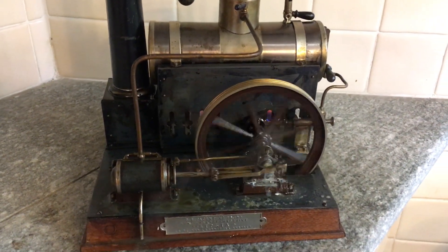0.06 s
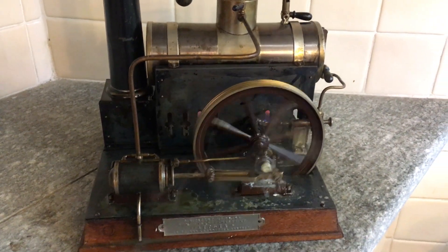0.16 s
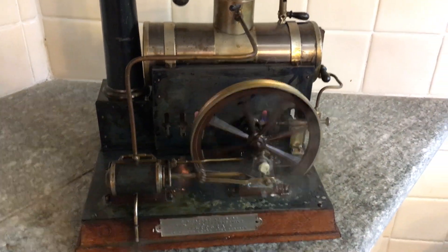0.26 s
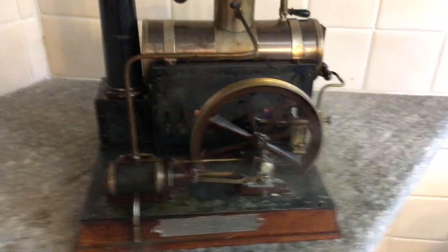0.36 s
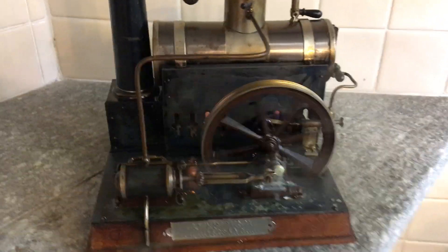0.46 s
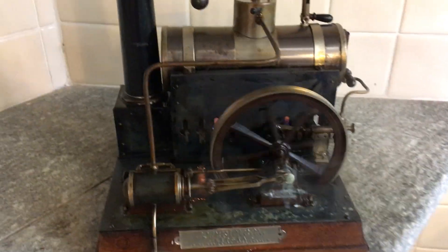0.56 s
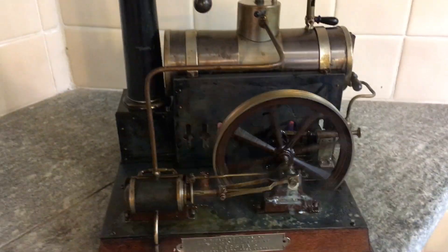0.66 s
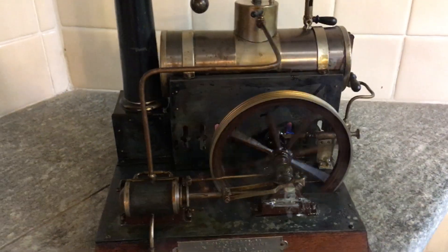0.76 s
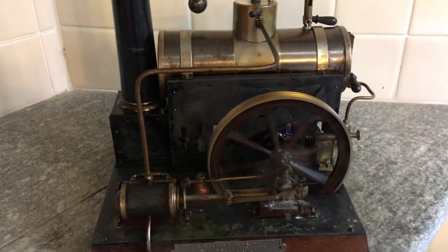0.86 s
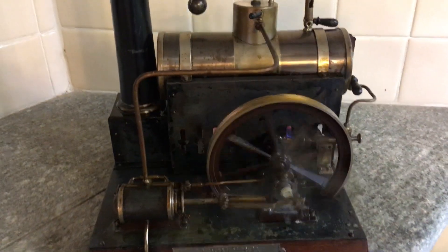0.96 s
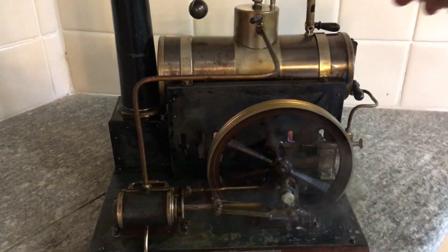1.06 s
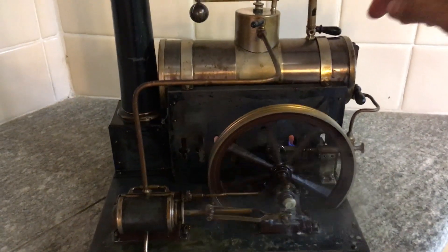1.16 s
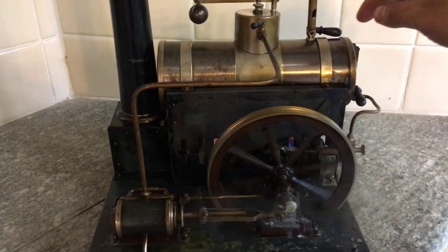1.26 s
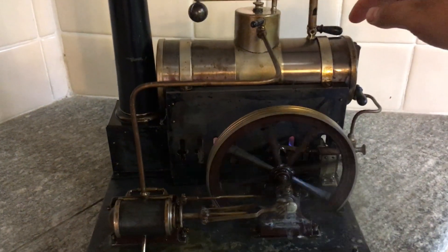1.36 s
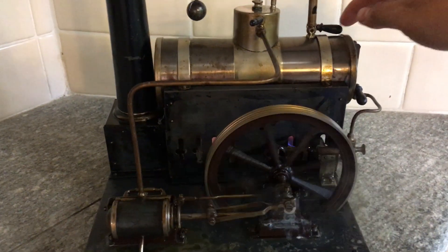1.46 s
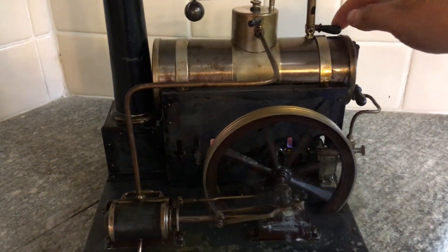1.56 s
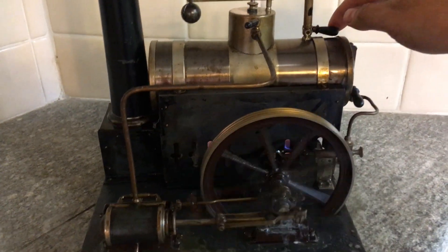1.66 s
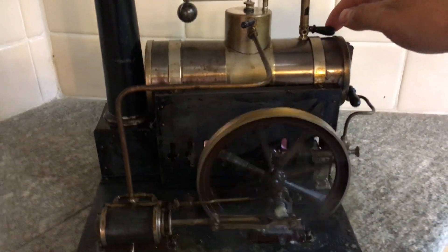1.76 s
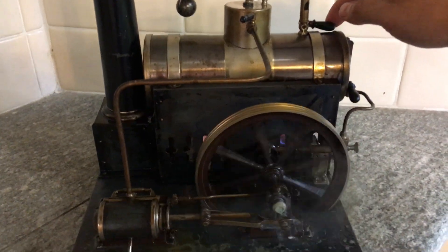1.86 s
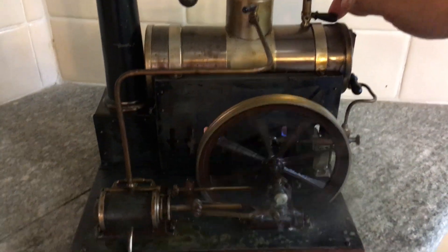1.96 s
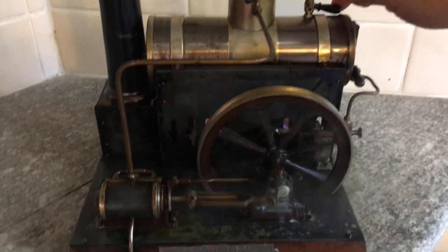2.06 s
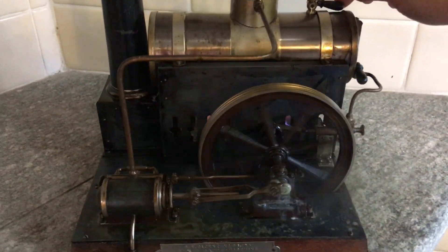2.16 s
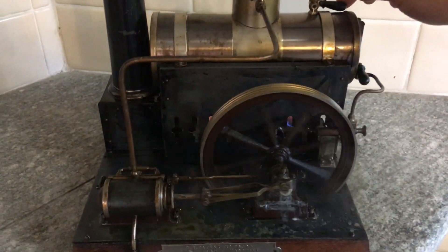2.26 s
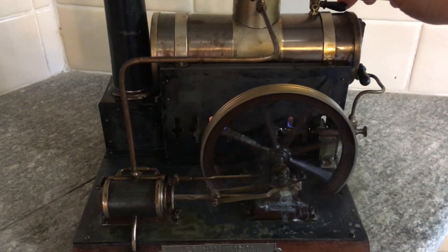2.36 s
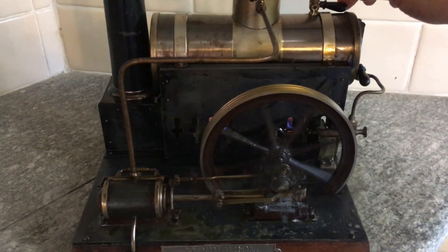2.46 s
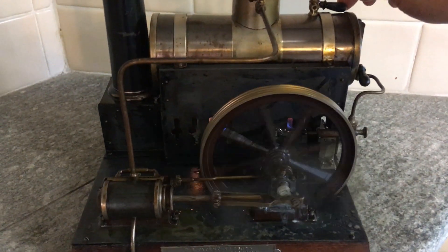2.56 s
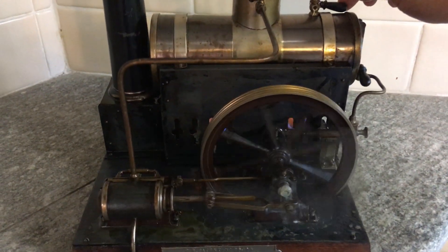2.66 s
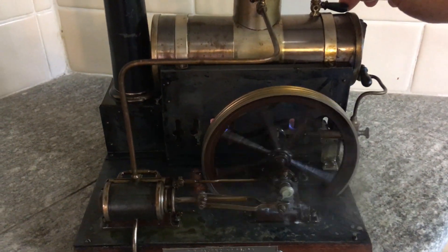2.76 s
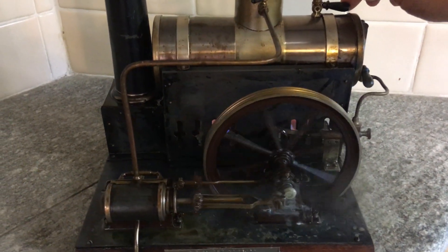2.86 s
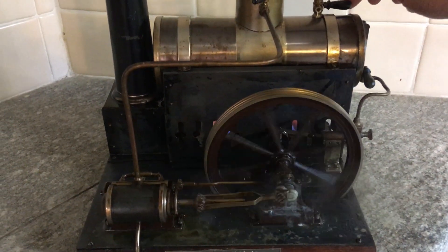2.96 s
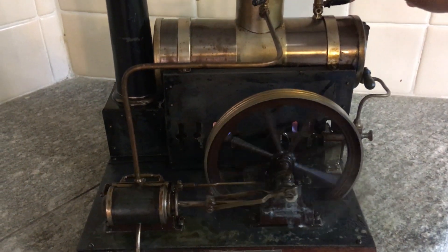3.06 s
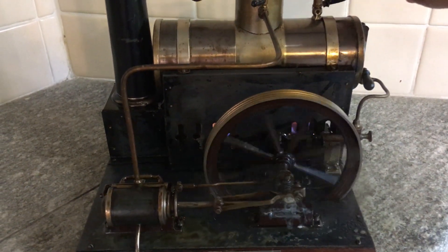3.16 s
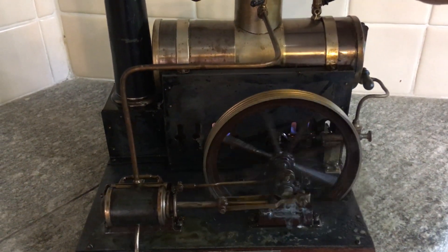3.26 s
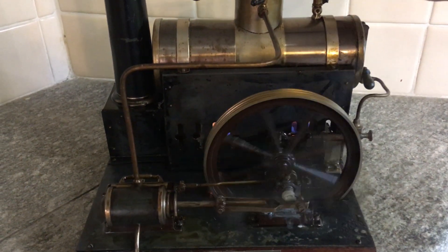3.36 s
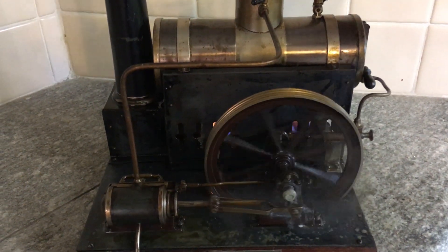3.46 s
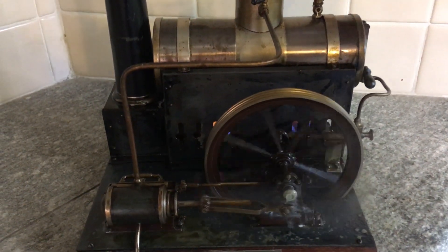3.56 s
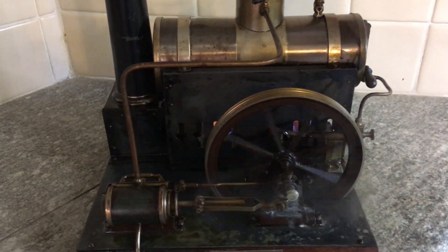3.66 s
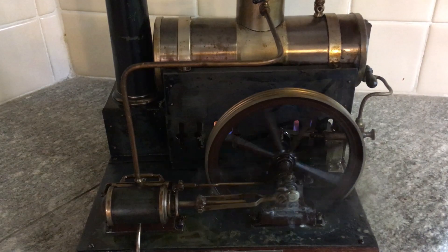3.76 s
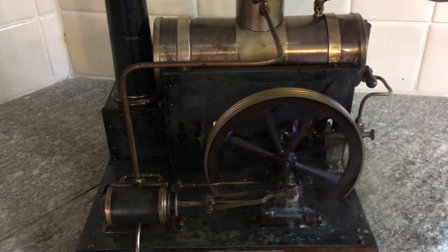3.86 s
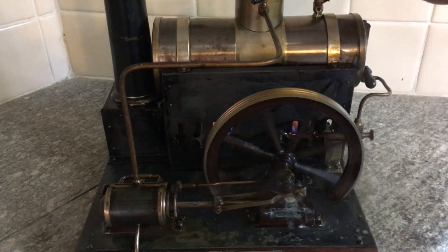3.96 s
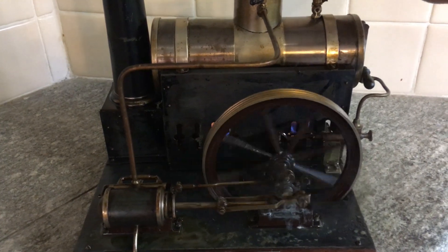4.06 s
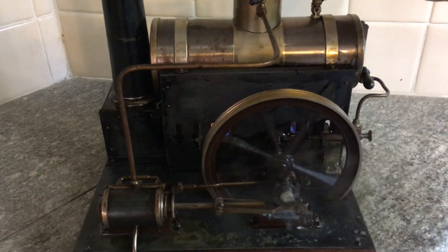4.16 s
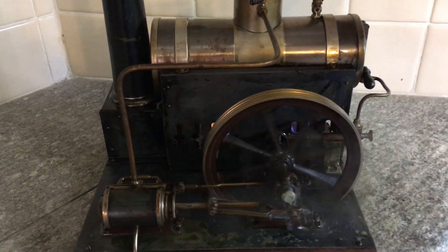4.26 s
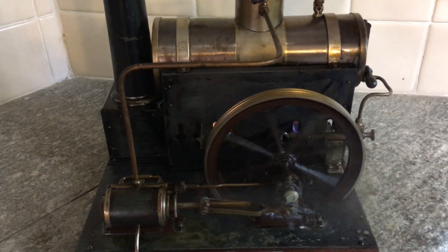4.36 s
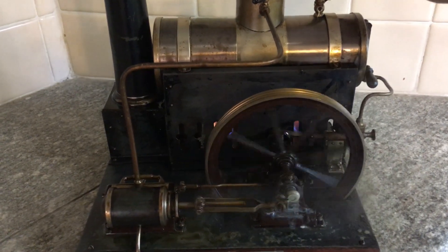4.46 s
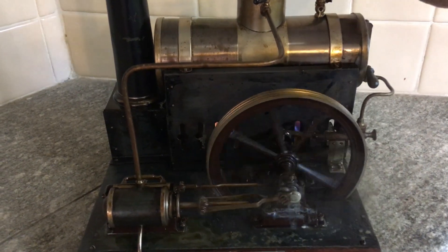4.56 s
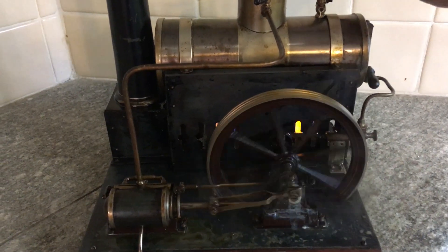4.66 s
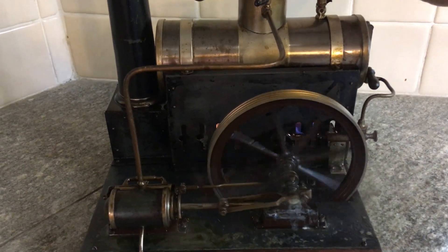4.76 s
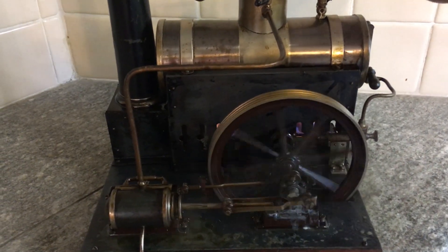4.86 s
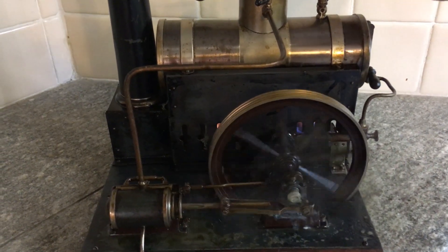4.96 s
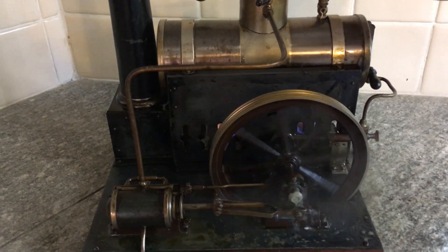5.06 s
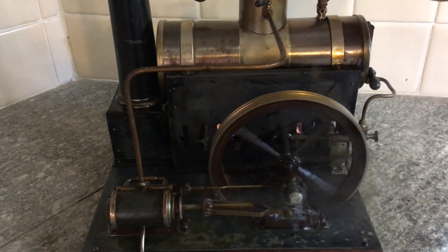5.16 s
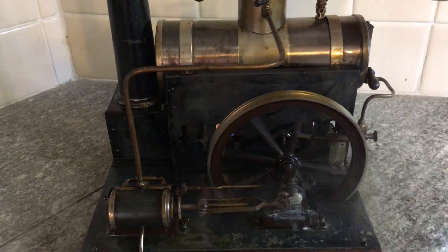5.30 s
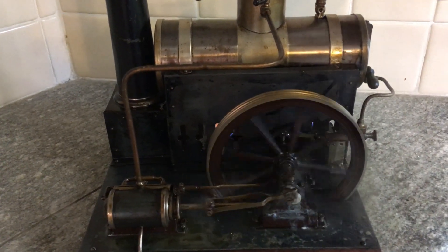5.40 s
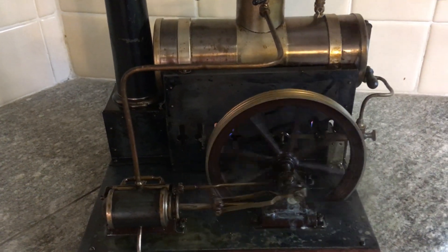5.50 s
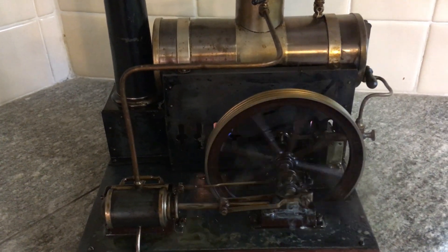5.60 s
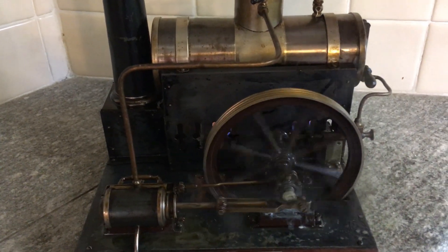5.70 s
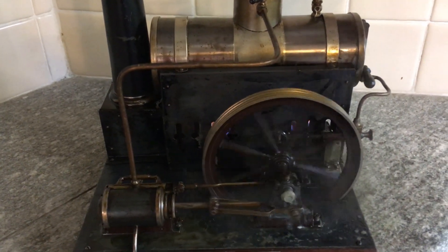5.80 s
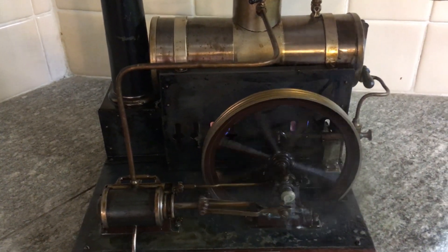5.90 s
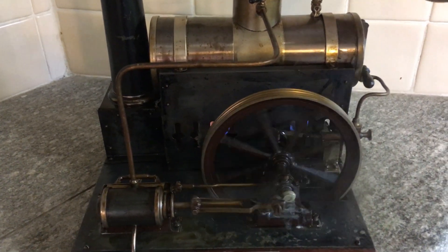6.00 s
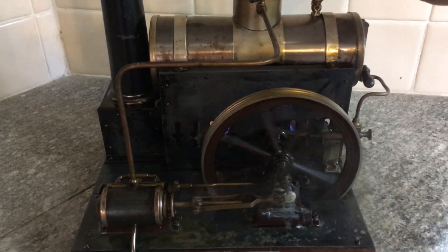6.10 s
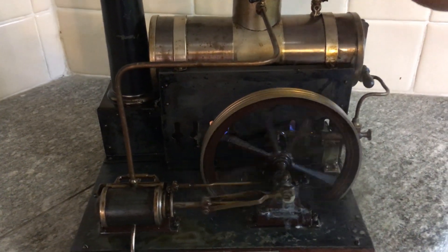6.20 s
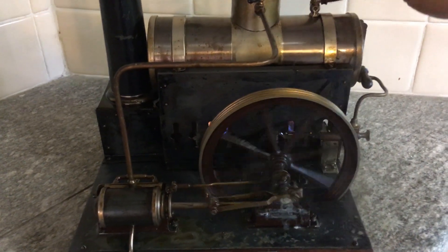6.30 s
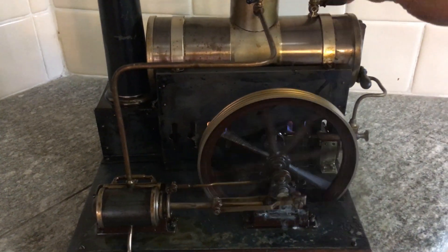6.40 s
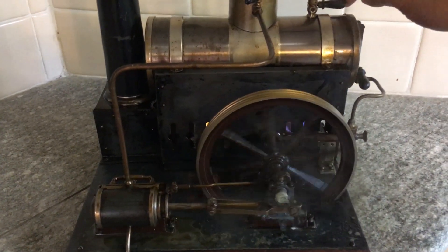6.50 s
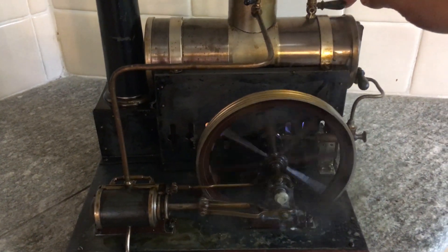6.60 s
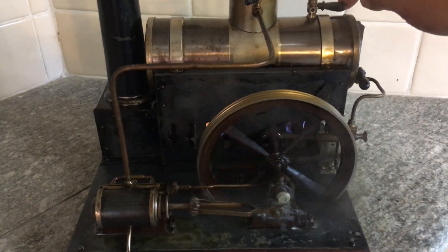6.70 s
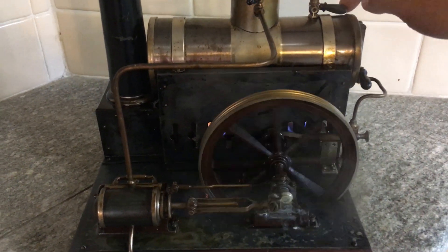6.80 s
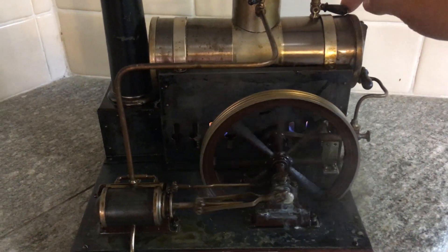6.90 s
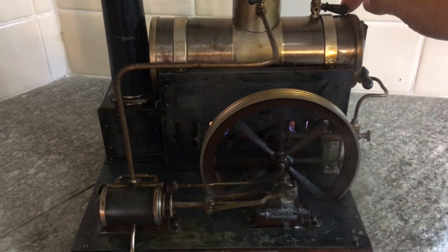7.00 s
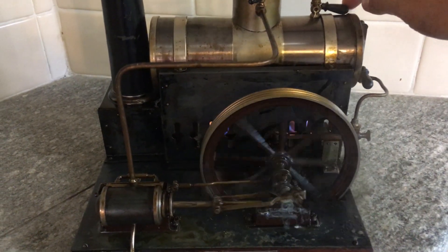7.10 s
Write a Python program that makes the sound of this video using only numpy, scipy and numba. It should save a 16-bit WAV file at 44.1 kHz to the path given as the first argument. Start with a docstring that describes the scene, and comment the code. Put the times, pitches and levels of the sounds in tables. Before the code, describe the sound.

Heard up close in a tiled kitchen, a miniature steam engine chuffs gently while its boiler sizzles and loose metal parts tick and faintly squeak. Then the steam whistle sounds three times, short, short and long, piercing and far louder than the engine, sliding up as it opens and down as it shuts. The background dips under the whistle, then the wet puffs, hiss and low fridge hum come back.

```python
"""Toy steam engine in a kitchen

The engine turns slowly, two wet exhaust puffs a turn, over a leaking, sizzling boiler.
Its whistle blows two short toots and a long one; pitch climbs and falls with the steam in the valve.
A fridge hums in the tiled room, and automatic gain control ducks everything under the whistle."""
import sys
import numpy as np
from scipy import signal
from scipy.fft import rfft, irfft, next_fast_len
from scipy.io import wavfile
from scipy.ndimage import uniform_filter1d, minimum_filter1d
from numba import njit

SR = 44100
rng = np.random.default_rng(int(sys.argv[2]) if len(sys.argv) > 2 else 0)


def inscribe(sig):
    """Save sig as 16-bit PCM at rate SR to the path in sys.argv[1].

    A 1-D sig is mono; a 2-D sig holds one channel per row.
    Samples are clipped to [-1, 1] before scaling.
    """
    pcm = np.round(np.clip(np.atleast_2d(sig).T, -1, 1) * 32767)
    wavfile.write(sys.argv[1], SR, pcm.astype(np.int16))


N = 314874
T = np.arange(N) / SR


def undb(db):
    """Decibels to gain."""
    return 10 ** (np.asarray(db) / 20)


def unit(x):
    """Scale to rms 1."""
    return x / np.sqrt(np.mean(x ** 2))


def decay(t, t60_s):
    """Exponential fall, 60 dB in t60_s."""
    return np.exp(-np.log(1000) * t / t60_s)


def bump(middle_s, width_s):
    """Bell-shaped swell of height 1."""
    return np.exp(-np.minimum(((T - middle_s) / width_s) ** 2, 50))


def walk(rate_hz):
    """Smooth random wander, rms 1."""
    hold = max(int(SR / rate_hz), 2)
    steps = np.repeat(rng.standard_normal(N // hold + 1), hold)
    return unit(uniform_filter1d(uniform_filter1d(steps, hold), hold)[:N])


def noise(colour):
    """Noise of rms 1, shaped by (freq_hz, level_db) points."""
    hz, db = np.transpose(colour)
    size = next_fast_len(N)
    bins_hz = np.maximum(np.arange(size // 2 + 1) * SR / size, 1)
    shape = undb(np.interp(np.log(bins_hz), np.log(hz), db))
    return unit(irfft(rfft(rng.standard_normal(size)) * shape, size)[:N])


def band(hz, width_hz):
    """Noise of rms 1 in one steep-sided resonance."""
    b, a = signal.iirpeak(hz, hz / width_hz, fs=SR)
    return unit(signal.lfilter(b, a, signal.lfilter(b, a, rng.standard_normal(N))))


def phase_of(hz):
    """Oscillator phase for a pitch curve."""
    return 2 * np.pi * np.cumsum(hz) / SR


def tiled_room(x, wet_db, t60_s=0.97, treble_t60_s=0.29, split_hz=7000, gap_s=0.008):
    """Diffuse ring of the tiles; the treble dies first."""
    t = np.arange(SR) / SR
    scatter = rng.standard_normal(SR) * (t > gap_s)
    low = signal.sosfiltfilt(signal.butter(4, split_hz, fs=SR, output="sos"), scatter)
    response = low * decay(t, t60_s) + (scatter - low) * decay(t, treble_t60_s)
    return undb(wet_db) * signal.fftconvolve(x, response / np.linalg.norm(response))[:N]


def early_echoes(x, share_db=-7, gap_s=0.00045, spread_s=.006, count=14):
    """Reflections off boiler, counter and wall comb the hiss."""
    lags = ((gap_s + spread_s * rng.random(count)) * SR).astype(int)
    gains = undb(share_db) * rng.choice([-1, 1], count) / np.sqrt(count)
    echoes = sum(gain * np.pad(x, (lag, 0))[:N] for lag, gain in zip(lags, gains))
    return (x + echoes) / np.hypot(1, undb(share_db))


# fridge mains and motor tones: pitch_hz, level_db
FRIDGE_HUM = [(100.8, -63), (98.33, -60.5)]
# room murmur spectrum: freq_hz, level_db
ROOM_COLOUR = [(20, -43.5), (30, -20), (39, 2.5), (52, 2), (72, -3), (130, -9.5), (200, -12.5), (400, -13),
               (750, -16.5), (1100, -11.5), (2000, -24), (3500, -19)]

def kitchen(murmur_db=-56.5):
    """Mains hum beats with the slightly slower fridge motor over a low murmur."""
    hum = sum(np.sqrt(2) * undb(db) * np.sin(2 * np.pi * hz * T) for hz, db in FRIDGE_HUM)
    return hum + undb(murmur_db + 0.52 * walk(18)) * noise(ROOM_COLOUR)


# leak envelope: time_s, level_db
LEAK_LEVEL = [(0, -48.5), (.6, -46.5), (1.35, -45.5), (2.2, -46), (2.75, -44), (3.2, -46), (6.25, -39.5),
              (6.55, -42), (6.95, -41.5), (7.14, -47.5)]
# leak spectrum: freq_hz, level_db
LEAK_COLOUR = [(700, -30), (1800, -12.5), (2600, -16), (3200, -13.5), (4300, -15), (6000, -7.5),
               (7400, -12), (8700, -3.5), (10300, -4.5), (11600, 1), (13100, -2), (15700, -5)]
# gap resonances: centre_hz, width_hz, relative_db
LEAK_RINGS = [(9640, 150, -14), (11400, 710, -22), (13500, 780, -14)]

def boiler_leak(hiss_db=0.48, sizzle_db=1.4, drift_db=.5):
    """Wet steam sizzles through narrow gaps in the fittings, which ring faintly."""
    envelope = undb(np.interp(T, *np.transpose(LEAK_LEVEL)))
    rings = sum(undb(db + 2 * walk(2.5)) * band(hz, width_hz) for hz, width_hz, db in LEAK_RINGS)
    hiss = undb(hiss_db) * noise(LEAK_COLOUR)
    return envelope * (hiss + rings) * undb(sizzle_db * walk(900) + drift_db * walk(35))


def linkage(level_db=-54.5, scatter_db=1.5, centre_hz=1100, t60_s=0.0091, count=90):
    """Play in rods and bearings: faint ticks at random moments."""
    out, t = np.zeros(N), np.arange(SR // 40) / SR
    for start, (size, pitch) in zip(rng.integers(0, N - len(t), count), rng.standard_normal((count, 2))):
        tick = np.sin(2 * np.pi * centre_hz * np.exp(.4 * pitch) * t) * decay(t, t60_s)
        out[start:start + len(t)] += undb(level_db + scatter_db * size) * tick
    return out


# a bearing, then the valve handle: middle_s, half_length_s, pitch_hz, glide_hz_per_s, level_db
SQUEAKS = [(1.128, .07, 1163, 250, -58), (2.69, 0.052, 1407, -1300, -55)]

def squeaks(scrape_hz=55, octave_db=-12):
    """Thin, unsteady tones of dry metal."""
    out = np.zeros(N)
    for middle_s, half_s, hz, glide_hz_per_s, db in SQUEAKS:
        phase = phase_of(hz + glide_hz_per_s * (T - middle_s) + scrape_hz * walk(360))
        out += undb(db) * bump(middle_s, half_s) * (np.sin(phase) + undb(octave_db) * np.sin(2 * phase))
    return out


def wisp(middle_s=2.663, width_s=.02, level_db=-45):
    """Steam slips past the valve as the handle is touched."""
    return undb(level_db) * bump(middle_s, width_s) * band(6500, 12000)


# taps: start_s, level_db, pitch_hz, t60_s
KNOCKS = [(0.3714, -25, 225, 0.0041), (0.371, -16.5, 905, 0.0012), (1.4174, -28, 1060, 0.015),
          (1.486, -42, 1100, 0.0059), (1.555, -41, 1180, 0.0064), (3.142, -45, 1120, 0.011),
          (3.3103, -30.5, 1657, 0.012), (6.32, -37.5, 1095, .012)]

def knocks():
    """Heavily damped taps of loose parts."""
    out, t = np.zeros(N), np.arange(SR // 20) / SR
    for start_s, db, hz, t60_s in KNOCKS:
        start = int(start_s * SR)
        out[start:start + len(t)] += undb(db) * np.sin(2 * np.pi * hz * t) * decay(t, t60_s)
    return out


# flywheel turns: start_s, level_db, upper_modes_db
TURNS = [(-.182, -35, -3), (.613, -37.5, -2), (1.414, -37.5, -3), (2.219, -38.5, 1.5), (3.023, -38.5, 1.5),
         (3.835, -44, 1), (4.615, -37.5, 4), (5.385, -38, -4), (6.156, -34.5, -1.5), (6.921, -37, 0)]
# strokes within a turn: delay_s, level_db, upper_modes_db
STROKES = [(0, 0, -1), (.301, -5, -7.5)]

def exhaust_strokes():
    """A strong and a weak stroke per flywheel turn."""
    return [(start_s + delay_s, db + stroke_db, upper_db + stroke_upper_db)
            for start_s, db, upper_db in TURNS
            for delay_s, stroke_db, stroke_upper_db in STROKES
            if 0 <= start_s + delay_s < T[-1] - .1]


# wet exhaust pipe: pitch_hz, level_db, t60_s, rise_s
EXHAUST_MODES = [(284, -11.5, 0.085, 0.0048), (512.2, -3, 0.34, 0.0038), (879.6, 3, 0.082, 0.0036),
                 (1025, -9, 0.034, 0.0034), (1790, -12, 0.072, 0.0022), (2276, -17, .05, .0015)]

def exhaust(glide=.36, glide_s=0.0094, open_s=0.03, roughness=0.25, spit_db=-6, spit_s=.016):
    """Each puff pushes water along the pipe, so its modes sink in pitch until the port shuts."""
    out, t = np.zeros(N), np.arange(SR // 10) / SR
    port = 1 / (1 + np.exp((t - open_s) / 0.00073))
    spit, gurgle = band(1150, 1600), walk(700)
    for start_s, db, upper_db in exhaust_strokes():
        span = slice(int(start_s * SR), int(start_s * SR) + len(t))
        sink = 1 + glide * np.exp(-t / glide_s) + 0.022 * rng.standard_normal()
        puff = undb(spit_db) * spit[span] * np.exp(-t / spit_s)
        for k, (hz, mode_db, t60_s, rise_s) in enumerate(EXHAUST_MODES):
            phase = phase_of(hz * sink * (1 + 0.056 * gurgle[span])) + 2 * np.pi * rng.random()
            ring = (1 - np.exp(-(t / rise_s) ** 2)) * decay(t, t60_s)
            puff += undb(mode_db + upper_db * (k > 1)) * ring * np.sin(phase)
        out[span] += undb(db) * port * puff * (1 + roughness * gurgle[span])
    return out


def valve_flow(open_s, shut_s, closing_ratio, rush_s=.019, creep_s=.053, creep_share=.49):
    """Steam flow, 0 to 1: a quick rush and a slower creep, mirrored on closing."""
    def shortfall(t):
        t = np.maximum(t, 0)
        return (1 - creep_share) * np.exp(-t / rush_s) + creep_share * np.exp(-t / creep_s)
    return np.maximum(1 - shortfall(T - open_s) - shortfall((shut_s - T) / closing_ratio), 0)


# valve openings: open_s, shut_s, full_hz, tone_db, overtones_db, jet_db, spray_db, closing_ratio
TOOTS = [(3.427, 3.862, 5011, 8.5, 0, -22.5, -25, 0.57), (4.106, 4.466, 4885, 13, -1.5, -21, -18, 0.52),
         (4.811, 6.107, 4976, 12, 0.5, -16.5, -16.5, 1.21)]

def jet_strength(lead_s=0.023, linger_s=0.013, rise_db_per_s=250, fall_db_per_s=295, flow_db=6):
    """The steam rush leads each toot, grows with the flow and lingers after it."""
    out = np.zeros(N)
    for open_s, shut_s, *_, jet_db, _, closing_ratio in TOOTS:
        held_db = jet_db + flow_db * valve_flow(open_s, shut_s, closing_ratio)
        early_s = np.maximum(open_s - lead_s - T, 0)
        late_s = np.maximum(T - shut_s - linger_s, 0)
        out += undb(held_db - rise_db_per_s * early_s - fall_db_per_s * late_s)
    return out


# steam rush spectrum: freq_hz, level_db
JET_COLOUR = [(200, -25), (800, -33), (1500, -22.5), (2300, -23), (3000, -12), (4200, -9.5), (4800, 9),
              (5450, -3), (5900, -3.5), (7300, -12.5), (9700, -1.5), (10700, -8.5), (13300, 1), (15700, -2)]

def jet(strength, draught_db=-45, gust_db=4, spray_delay_s=.018, spray_width_s=.068):
    """Steam rushes from the whistle, stirs low gusts and spits condensate at each opening."""
    rush = noise(JET_COLOUR) * undb(1.44 * walk(40) + 1.2 * walk(400))
    draught = undb(draught_db + gust_db * walk(22)) * band(90, 200)
    bursts = sum(undb(spray_db) * bump(open_s + spray_delay_s, spray_width_s)
                 for open_s, *_, spray_db, _ in TOOTS)
    spray = bursts * band(13600, 3200) * undb(2 * walk(900))
    return strength * (early_echoes(rush) + draught) + spray


def chirps(low_hz=4620, high_hz=5723, jitter_hz=80, length_s=.04, offset_s=0.008, above_jet_db=7.5):
    """The weak jet catches a higher mode: up as the valve opens, down as it shuts."""
    out, wobble_hz = np.zeros(N), jitter_hz * walk(900)
    ramp = np.linspace(0, 1, int(length_s * SR))
    envelope = np.sqrt(2) * np.sin(np.pi * ramp) ** 2
    rising_hz = low_hz + (high_hz - low_hz) * ramp
    for open_s, shut_s, *_, jet_db, _, _ in TOOTS:
        for middle_s, hz in (open_s - offset_s, rising_hz), (shut_s + offset_s, rising_hz[::-1]):
            start = int((middle_s - length_s / 2) * SR)
            span = slice(start, start + len(ramp))
            out[span] += undb(jet_db + above_jet_db) * envelope * np.sin(phase_of(hz + wobble_hz[span]))
    return out


def edge_tone(hz, gain, overtones_db, jitter_hz=10, waver_hz=7, loose_hz=120, lock_db=-12):
    """Breathy while the jet is weak, nearly pure once it locks to the pipe."""
    locked = gain ** 2 / (gain ** 2 + undb(lock_db) ** 2)
    phase = phase_of(hz + waver_hz * walk(45) + (jitter_hz + loose_hz * (1 - locked)) * walk(800))
    roughness = .012 + .33 * (1 - locked)
    flutter = 1 + .028 * walk(65) + roughness * walk(600)
    second = undb(-19 + 3.5 * walk(55)) * np.sin(2 * phase)
    third = undb(-24 + 3.5 * walk(70)) * np.sin(3 * phase)
    overtones = locked * undb(overtones_db) * (second + third)
    return np.sqrt(2) * gain * flutter * (np.sin(phase) + overtones)


# whistle pipe resonance: pitch_hz, gain_db
WHISTLE_RESPONSE = [(3000, -48), (3600, -31), (4470, -21.5), (4560, -7.5), (4800, -3), (5050, -1)]
# small wavers in the held whistle's pitch and loudness: time_s, offset_hz, offset_db
WHISTLE_WAVER = [(3.5, 1.5, 0), (3.65, 44, -3), (3.74, -15.5, -4.5), (3.82, 1, -3), (4.379, -0.5, -2),
                 (4.93, 1, 0.5), (5.02, 56.5, -3.5), (5.062, -9.5, -1), (5.2, -27, -1.5), (5.25, 33, -1.5),
                 (5.48, -13, 0), (5.68, 29.5, -1.5), (5.75, -28.5, 0.5), (5.89, 20.5, 2), (5.98, -10, 1)]

def whistle(lowest_hz=2985, wander_hz=6, wander_db=.5):
    """Flow sets the pitch; the level leaps as the pitch reaches the pipe's resonance."""
    out = chirps()
    time_s, waver_hz, waver_db = np.transpose(WHISTLE_WAVER)
    drift_hz = np.interp(T, time_s, waver_hz) + wander_hz * walk(30)
    drift_db = np.interp(T, time_s, waver_db) + wander_db * walk(30)
    for open_s, shut_s, full_hz, tone_db, overtones_db, _, _, closing_ratio in TOOTS:
        hz = lowest_hz + (full_hz - lowest_hz) * valve_flow(open_s, shut_s, closing_ratio)
        resonance_db = np.interp(hz, *np.transpose(WHISTLE_RESPONSE))
        gain = undb(tone_db + drift_db + resonance_db) * (hz > lowest_hz)
        out += edge_tone(hz + drift_hz, gain, overtones_db)
    return out


def scene():
    """Engine, whistle and room in mono."""
    strength = jet_strength()
    tone = whistle()
    hiss = jet(strength) + early_echoes(boiler_leak())
    works = exhaust() + knocks() + linkage() + squeaks() + wisp()
    # radiates upward, so it arrives only by way of the room
    pipe_breath = undb(10.5) * strength * band(4650, 1100)
    room = tiled_room(tone + pipe_breath, wet_db=-28, t60_s=0.73)
    room += tiled_room(hiss, wet_db=-17.5) + tiled_room(works, wet_db=-18.5)
    return (tone + hiss + works + room + kitchen())[None]


@njit
def gain_control(x, now_db, late_db, limit_db, attack_s, release_db_per_s2):
    """Gain sinks just after the output passes the limit; it returns ever faster once well under."""
    out, cut_db, quiet_s = np.empty(len(x)), 0., 0.
    for i in range(len(x)):
        over_db = max(late_db[i] - cut_db - limit_db, 0.)
        quiet = max(now_db[i], late_db[i]) - cut_db < limit_db - 10
        quiet_s = quiet_s + 1 / SR if quiet else 0.
        cut_db = max(cut_db + (over_db / attack_s - release_db_per_s2 * quiet_s) / SR, 0.)
        out[i] = x[i] * 10 ** (-cut_db / 20)
    return out


def record(dry, ceiling=0.69, react_s=0.14, limit_db=-13.5, attack_s=0.018, release_db_per_s2=64.5,
           top_hz=15750):
    """Late gain control, a limiter for the peaks that outrun it, then a steep low-pass."""
    level_db = 10 * np.log10(np.abs(uniform_filter1d(dry[0] ** 2, size=441)) + 1e-12)
    late_db = np.interp(T - react_s, T, level_db)
    ducked = gain_control(dry[0], level_db, late_db, limit_db, attack_s, release_db_per_s2)
    peak_gain = ceiling / np.maximum(np.abs(ducked), ceiling)
    limited = ducked * uniform_filter1d(minimum_filter1d(peak_gain, size=176), size=176)
    return signal.sosfilt(signal.ellip(12, .1, 80, top_hz, fs=SR, output="sos"), limited)[None]


dry = scene()
out = record(dry)
inscribe(out)
```